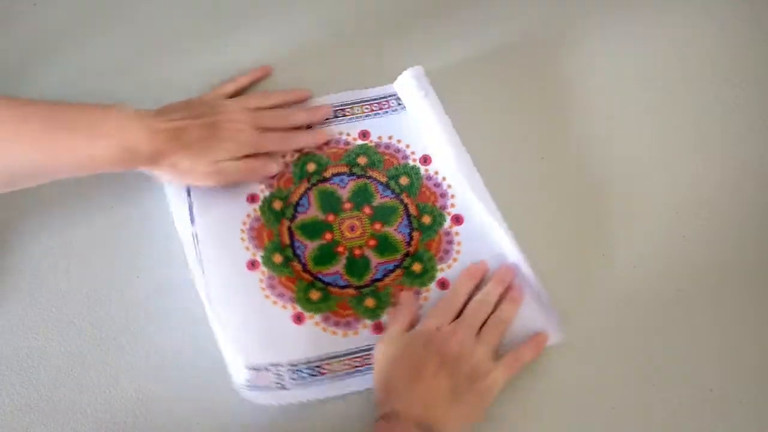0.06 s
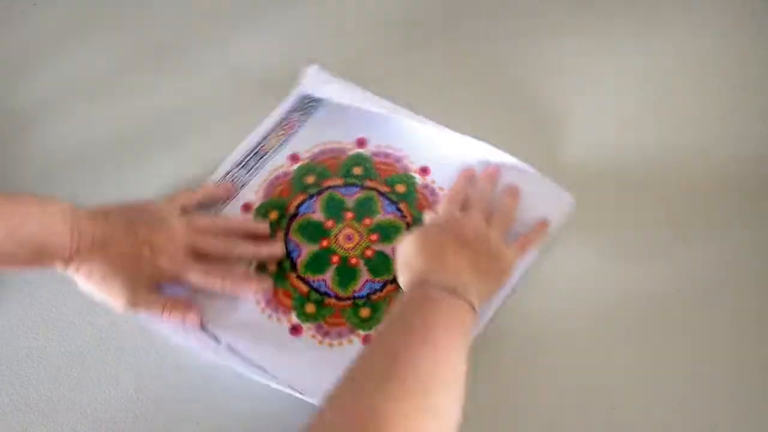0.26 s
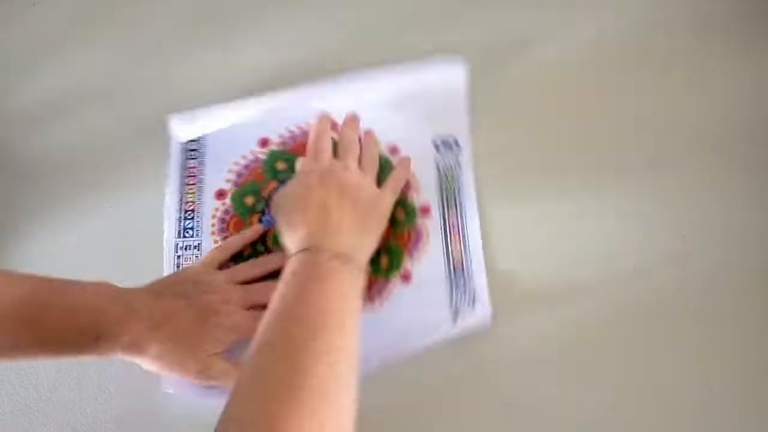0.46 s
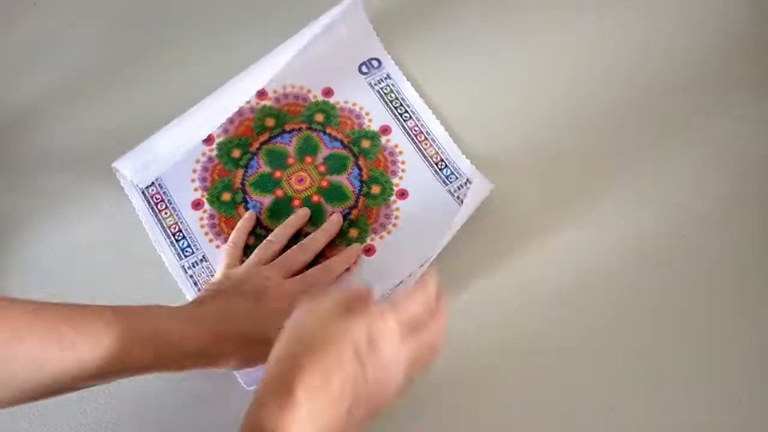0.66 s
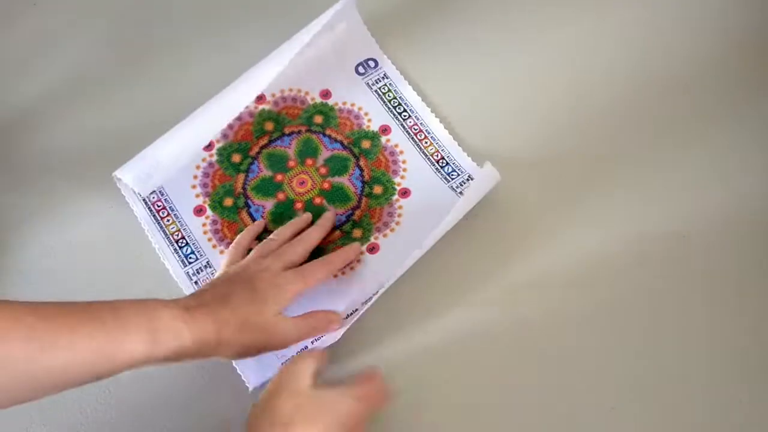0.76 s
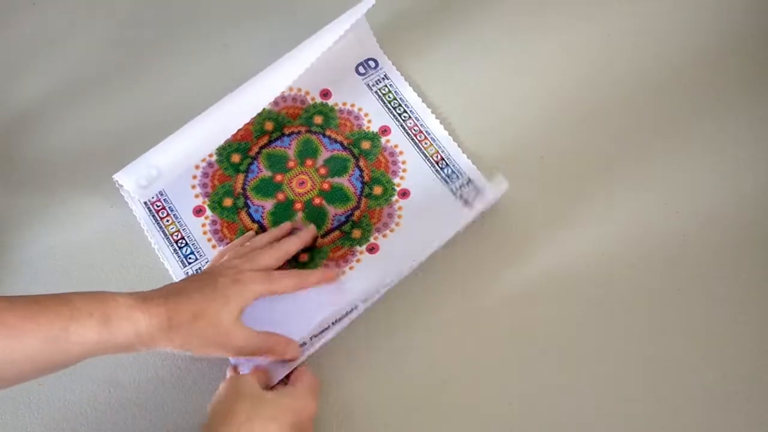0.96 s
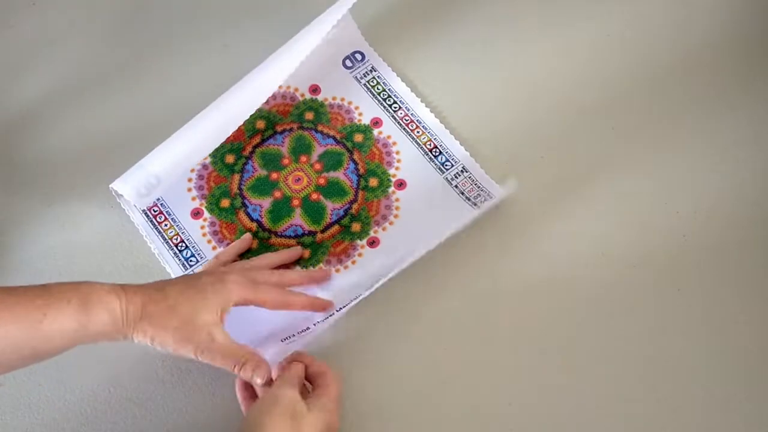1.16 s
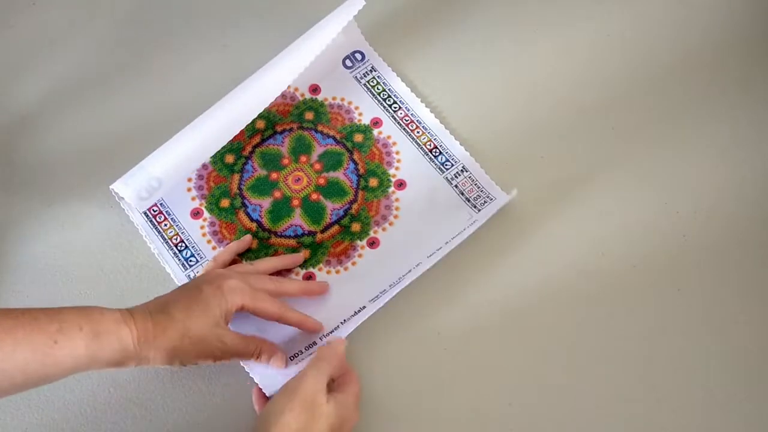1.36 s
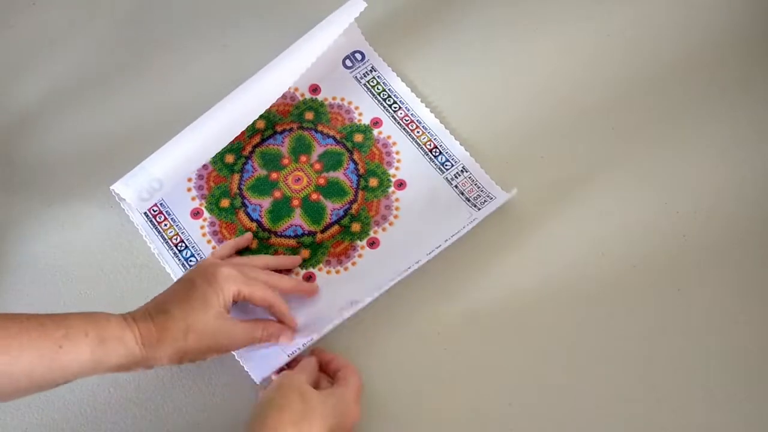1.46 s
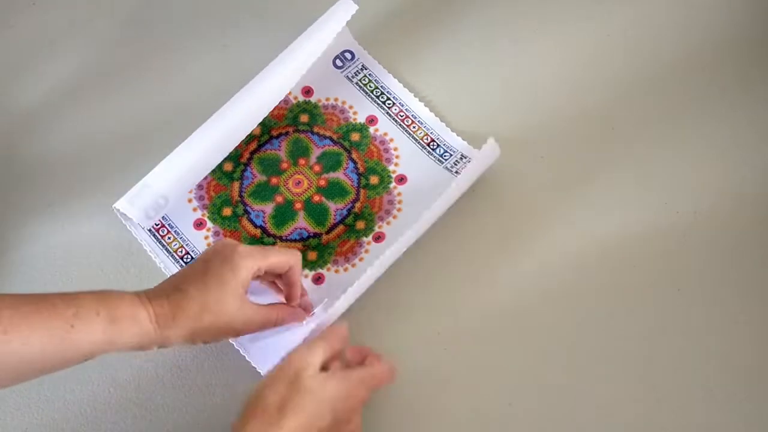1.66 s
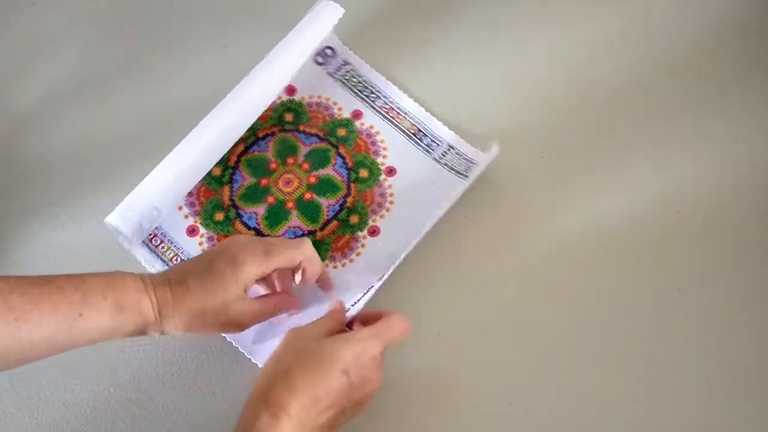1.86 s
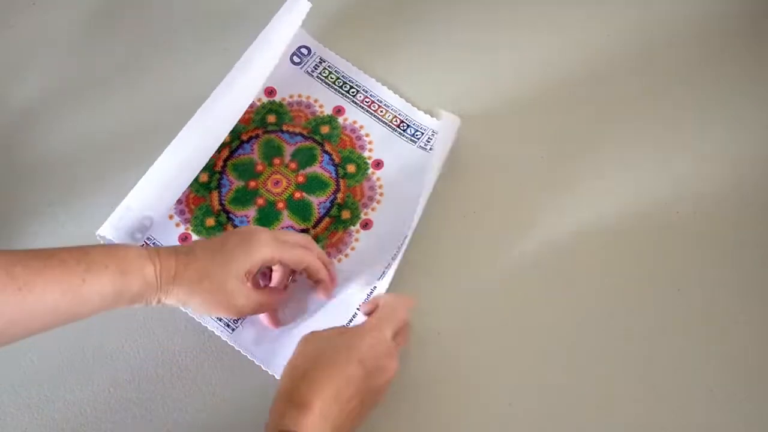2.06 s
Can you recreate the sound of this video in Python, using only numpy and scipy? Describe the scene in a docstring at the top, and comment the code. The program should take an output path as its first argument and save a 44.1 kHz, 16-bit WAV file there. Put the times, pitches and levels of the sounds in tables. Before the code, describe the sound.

Plastic film on a canvas slides and crackles sharply on a wooden table, then crinkles lightly under fingers

```python
"""A film-covered canvas is slid round on a wooden table, then fingers pick at its curled edge, close under a mono phone.
The slide is dense tiny slips and hiss of the film over a duller canvas drag with a resonant note.
Creases snap as clusters of clicks that also thump the sheet; finger taps ring the modes of the table top.
Palm presses push air at the phone; handling rumble, murmur of the house and hiss lie beneath, in a quiet small room."""
import sys
import numpy as np
from scipy import signal
from scipy.fft import rfft, irfft
from scipy.io import wavfile
from scipy.ndimage import uniform_filter1d

SR = 44100
rng = np.random.default_rng(int(sys.argv[2]) if len(sys.argv) > 2 else 0)


def transcribe(signal):
    """Save signal, clipped to [-1, 1], as a 16-bit WAV file at the path in sys.argv[1]."""
    frames = np.atleast_2d(signal).T
    limited = np.clip(frames, -1, 1)
    pcm = np.round(limited * 32767).astype(np.int16)
    wavfile.write(sys.argv[1], SR, pcm)


def gain_from_db(level_db):
    """Turn a decibel level (scalar or array-like) into a linear amplitude factor."""
    decades = np.asarray(level_db, float) / 20
    return 10 ** decades


N = 94815
T = np.arange(N) / SR

# canvas slid round: start_s, film_gain_db, drag_gain_db
SLIDE = [(0, -54, -63), (0.079, -46, -52.5), (.15, -42.5, -56.5), (.25, -38, -53), (.36, -37.5, -51.5),
         (.43, -35, -54.5), (.47, -36, -51), (.5, -38, -55.5), (.56, -36.5, -51.5), (.63, -41.5, -57.5),
         (.675, -47.5, -58.5), (.71, -42.5, -55), (.75, -49.5, -58.5), (0.801, -55, -73)]
# sheet rustling under the fingers: start_s, film_gain_db, drag_gain_db
RUSTLE = [(.82, -55, -63), (.88, -62, -86), (.96, -58.5, -69), (1.05, -59.5, -67.5), (1.13, -51, -60.5),
          (1.2, -53, -62.5), (1.27, -50, -61), (1.34, -49, -58.5), (1.4, -57.5, -69), (1.45, -64.5, -89),
          (1.53, -67, -99), (1.57, -58.5, -76), (1.65, -54, -69), (1.72, -57, -69), (1.8, -61.5, -69.5),
          (1.87, -52.5, -66), (1.91, -61, -65), (1.97, -51.5, -61), (2.04, -57.5, -59.5), (2.101, -46, -61),
          (2.15, -56, -56)]


def unit(x):
    """Scale to rms 1."""
    return x / np.sqrt(np.mean(x ** 2) + 1e-30)


def colour(x, curve):
    """Causal minimum-phase filter of unit energy whose gain follows (Hz, dB) points."""
    hz, db = np.array(curve, float).T
    size = 8192
    grid_hz = np.maximum(np.arange(size // 2 + 1) * SR / size, 1)
    log_gain = np.interp(np.log(grid_hz), np.log(hz), db) * np.log(10) / 20
    cepstrum = irfft(log_gain)
    cepstrum[1:size // 2] *= 2  # fold to minimum phase
    cepstrum[size // 2 + 1:] = 0
    h = irfft(np.exp(rfft(cepstrum)))
    return signal.fftconvolve(x, h / np.sqrt(np.sum(h ** 2)))[:len(x)]


def ring(x, hz, t60_s):
    """One decaying mode, envelope near 1 for a unit blow."""
    r = 1000 ** (-1 / (t60_s * SR))
    w = 2 * np.pi * hz / SR
    return signal.lfilter([0, np.sin(w)], [1, -2 * r * np.cos(w), r * r], x)


def clicks(rate_per_s, spread_db):
    """Random clicks of either sign, a few much stronger than the rest."""
    u = rng.random((3, N))
    strength = gain_from_db(-spread_db * np.log(u[2] + 1e-4))
    return (u[0] < rate_per_s / SR) * np.sign(u[1] - .5) * strength


def walk(rate_hz):
    """Slow random wander, rms 1."""
    k = int(SR / rate_hz)
    return unit(uniform_filter1d(uniform_filter1d(rng.standard_normal(N), k), k))


def butter(x, order, hz, kind):
    """Butterworth filter."""
    return signal.sosfilt(signal.butter(order, hz, kind, fs=SR, output="sos"), x)


def table_top(force, deep_db=0.):
    """The wooden top rings in its modes; the spot that is hit sets how much the deep one speaks."""
    # hz, gain_db, t60_s
    modes = [(203, -8, .2), (339, 0, .42), (385, -9, .12), (435, -7, .08), (540, -5, .07), (680, -5, .06),
             (905, -9, .05), (1180, 2, .1)]
    deep_mode = 1  # row number
    out = np.zeros(len(force))
    for k, (hz, db, t60_s) in enumerate(modes):
        out += gain_from_db(db + deep_db * (k == deep_mode)) * ring(force, hz, t60_s)
    return out


def film_rub():
    """Film sliding: dense tiny slips, steady hiss and stray stronger ticks, slightly patchy in level."""
    # film as the phone hears it: hz, density_db
    film_colour = [(760, -42.5), (1300, -41), (2100, -9), (2280, -3), (2900, 1), (3460, -4), (5070, -9.5),
                   (7670, 0.5), (9100, -9), (11500, -9), (14400, 1), (16000, -6.5), (16500, -44)]
    slips_per_s, slip_spread_db, hiss_share = 8000, 2, 0.75  # share of power
    ticks_per_s, tick_gain_db, tick_spread_db = 250, 8., 3.
    slips = np.sqrt(1 - hiss_share) * unit(clicks(slips_per_s, slip_spread_db))
    hiss = np.sqrt(hiss_share) * rng.standard_normal(N)
    ticks = gain_from_db(tick_gain_db) * clicks(ticks_per_s, tick_spread_db)
    t, film_db, _ = np.vstack([SLIDE, RUSTLE]).T
    patchy_db = 1.2 * walk(56)
    return colour(slips + hiss + ticks, film_colour) * gain_from_db(np.interp(T, t, film_db) + patchy_db)


def drag_note():
    """Noise through a resonator of moving pitch, which rises and then falls during the slide."""
    # resonance of the drag: start_s, pitch_hz
    pitch = [(0, 694), (.2, 700), (.28, 940), (.46, 1090), (.58, 1090), (.68, 670)]
    t60_s, start_s, end_s, fade_s = 0.0098, .1, 0.757, 0.087  # dies as the slide stops
    turn = np.exp(2j * np.pi * np.cumsum(np.interp(T, *np.array(pitch).T)) / SR)
    r = 1000 ** (-1 / (t60_s * SR))
    # decay computed in a frame that turns with the pitch
    note = (signal.lfilter([1], [1, -r], rng.standard_normal(N) / turn) * turn).real
    fade = np.clip(np.minimum(end_s - T, T - start_s) / fade_s, 0, 1)
    return unit(note) * fade


def canvas_drag():
    """Canvas on wood: dull friction noise that also drives the table top, plus the resonant note."""
    # canvas on wood: hz, density_db
    canvas_colour = [(120, -21.5), (200, 4), (286, -3.5), (333, 3), (472, 0.5), (658, 3.5), (1060, 4),
                     (1270, 5.5), (1700, 7.5), (2210, 8), (3740, -120)]
    table_db, note_db = -18., 0.5
    push = rng.standard_normal(N) * gain_from_db(1.5 * walk(90))
    drag = colour(push, canvas_colour)
    drag += gain_from_db(table_db) * unit(table_top(push))
    drag += gain_from_db(note_db) * drag_note()
    t, _, drag_db = np.vstack([SLIDE, RUSTLE]).T
    return drag * gain_from_db(np.interp(T, t, drag_db))


def snap_burst(scale_s):
    """One crease letting go: a cluster of clicks over 3 scale times, swelling then fading; energy 1."""
    u, v, w = rng.random((3, 300))  # 300 clicks
    rise, hold, click_spread_db = 0.12, .7, 2.5  # rise and hold in scale times
    late = 3 * u
    swell = np.minimum(late / rise, 1)
    fade = np.exp(-1.5 * np.maximum(late - hold, 0))
    strength = gain_from_db(-click_spread_db * np.log(v + 0.18))
    burst = np.zeros(SR // 8)
    np.add.at(burst, (late * scale_s * SR).astype(int), np.sign(w - .5) * fade * swell * strength)
    return burst / np.sqrt(np.sum(burst ** 2))


def snaps():
    """Each crease snaps as a click burst that also thumps the sheet in a broad resonance."""
    # creases: start_s, burst_gain_db, time_scale_ms, sheet_body_db (energy re burst), sheet_body_hz,
    # below_split_db (re the part above the split)
    creases = [(0.4545, -13.5, 2.7, -16, 2790, -9), (.508, -13, 4.7, -32, 3130, -11.5),
               (0.5273, -6.5, 0.32, -30, 3300, -3), (0.5493, -13, 0.66, -28, 2570, 0),
               (0.5534, -14, 2.4, -32, 3020, -0.5), (0.5756, -8.5, 2.53, -15.5, 1330, -7),
               (0.5814, -4, 2.07, -19, 3330, -5), (0.5845, -8.5, 2.95, -11.5, 2030, 0),
               (0.5888, -7, 5.5, -34, 3200, -8.5), (0.5938, -7.5, 1.2, -23, 2820, -2.5),
               (0.598, -11.5, 6.4, -35, 2500, -13), (0.6886, -36, 8.2, 1.5, 2770, -5),
               (0.7656, -24, 2.5, -8.5, 2140, -4), (0.8226, -38, 2.9, -18, 3000, 6.5),
               (0.848, -27, 6.2, -9, 2900, -5), (0.8538, -33, 7.6, -8, 2200, -8),
               (0.914, -46.5, 10.3, 5.5, 3050, -17), (0.9456, -39.5, 6.8, 1, 2800, -12),
               (1.0088, -37, 15, -17, 1780, -9), (1.022, -27, 11.3, -20, 2070, -13),
               (1.0841, -30.5, 6.2, -7.5, 2480, -4.5), (1.1141, -21, 2.92, -5.5, 2640, -5.5),
               (1.14, -31, 8.5, -3, 1420, 1), (1.1831, -24.5, 2.9, -18, 2060, -8.5),
               (1.2393, -22.5, 3.5, -11, 2420, -8), (1.262, -18, 2.1, -22, 2020, -16),
               (1.281, -22, 1.3, -29, 2690, -7), (1.2898, -23, 5.4, -16, 2430, -16),
               (1.2935, -20, 1.8, -34, 2570, -15), (1.2982, -15.5, 2.6, -37, 2600, -5.5),
               (1.3017, -10.5, 2.11, -13, 2730, -11), (1.306, -16, 7.6, -32, 2490, -2.5),
               (1.343, -36, 7.2, -4, 1410, 1), (1.419, -43.5, 8.1, 2.5, 3100, 1.5),
               (1.56, -39, 5.5, -10, 1420, -8), (1.5807, -28.5, 6.9, -8.5, 2650, -9.5),
               (1.6133, -15, 2.25, -9, 1760, -4), (1.634, -37, 10, 0, 2440, -12),
               (1.6601, -19, 2.9, -9, 2800, -17), (1.6653, -13, 1.04, -33, 1880, -16),
               (1.7346, -31.5, 6.4, -9.5, 2680, -3.5), (1.7726, -31, 3.86, -7.5, 1770, 2.5),
               (1.8086, -33.5, 3, -6, 2460, 3), (1.8196, -21.5, 3.8, -15.5, 2590, -6.5),
               (1.8502, -23.5, 4.75, -8, 2560, -5.5), (1.94, -40, 5, -4.5, 3420, 2),
               (1.953, -27.5, 5.8, -5, 2620, -7), (2.0024, -31.5, 7.7, -4.5, 2660, -7),
               (2.009, -26, 2.54, -12, 2070, 1.5), (2.064, -44, 7.7, 3, 2100, -0.5),
               (2.0764, -21, 5.8, -12, 2260, -4.5), (2.086, -20.5, 6, -12, 1790, -5),
               (2.114, -34.5, 6.8, -2, 2270, -15), (2.1296, -23.5, 4, -18, 3060, -4.5)]
    # hz, density_db
    snap_colour = [(1470, -21.5), (2500, -6), (3240, -1.5), (5010, -7), (7550, 3), (8770, -3.5),
                   (10300, -6.5), (11100, -8), (14400, 3), (16000, -5.5), (16500, -41)]
    split_hz, body_cut_hz, body_q = 10000, 1210, 2.4
    top, mid, body = np.zeros((3, N + SR))
    for s, db, ms, body_db, hz, mid_db in creases:
        # longer bursts carry more energy
        burst = snap_burst(ms / 1000) * gain_from_db(db) * np.sqrt(1 + ms / 1000 * SR / 20)
        thump = ring(burst, hz, body_q * np.log(1000) / (np.pi * hz))
        match = np.sqrt(np.sum(burst ** 2) / np.sum(thump ** 2))
        at = slice(int(s * SR), int(s * SR) + len(burst))
        top[at] += burst
        mid[at] += burst * gain_from_db(mid_db)
        body[at] += thump * gain_from_db(body_db) * match
    crackle = butter(top[:N], 3, split_hz, "high") + butter(mid[:N], 3, split_hz, "low")
    return colour(crackle, snap_colour) + butter(body[:N], 3, body_cut_hz, "high")


def taps():
    """Soft fingertip pushes, each with a short scuff, ring the table top until the resting hand mutes it."""
    # start_s, push_gain_db, contact_ms, deep_mode_db, scuff_db (re push gain), free_ring_s
    touches = [(.9115, -43, 0.65, -12, -12, 0.018), (.919, -54, 2.3, -7, -16, 0.13),
               (.937, -50, 0.67, -7, -7, .1), (.946, -53, 0.39, -15, -4, 0.13),
               (.963, -45, 1.9, -0.5, -12, 0.062), (1.4176, -45.5, 0.9, -14, -12, .006),
               (1.423, -45.5, 2.05, 4.5, -26, 0.027), (1.945, -57, 0.58, -5, -2.5, .1),
               (2.08, -50, 1.1, -0.5, -8.5, .05), (2.105, -55, 2.1, -11, -10, 0.044),
               (2.118, -45.5, 2.6, -4, -12.5, .04)]
    mute_db, mute_s = -13.5, 0.0087
    scuff_decay_s, scuff_top_hz = 0.022, 1110  # the hand settles noisily
    wood, scuff = np.zeros((2, N))
    for s, db, ms, deep_db, scuff_db, free_s in touches:
        contact_s = ms / 1000
        x = (T - s) / contact_s
        force = gain_from_db(db) * (abs(x - .5) < .5) * np.sin(np.pi * x) / (contact_s * SR)  # half sine
        mute = gain_from_db(mute_db * np.clip((T - s - free_s) / mute_s, 0, 1))
        wood += table_top(force, deep_db) * mute
        scuff += gain_from_db(db + scuff_db) * (T > s) * np.exp(-abs(T - s) / scuff_decay_s)
    noise = unit(butter(rng.standard_normal(N), 2, [150, scuff_top_hz], "band"))
    return butter(wood, 2, 150, "high") + scuff * noise


def presses():
    """The palm presses the sheet flat, pushing air at the phone: one slow pressure swing each."""
    # centre_s, peak_db, length_ms
    pushes = [(.592, -53, 55), (.74, -55, 130)]
    out = np.zeros(N)
    for s, db, ms in pushes:
        x = (T - s) * 2000 * np.pi / ms
        out -= gain_from_db(db) * 1.65 * x * np.exp(-x ** 2 / 2)  # 1.65 brings the peak to 1
    return out


def rumble():
    """Handling rumble: two bands of bass noise with separately moving levels."""
    # start_s, level_below_50_hz_db, level_60_to_160_hz_db
    surge = [(0.0, -70, -81), (0.04, -65.5, -67.5), (0.53, -61.5, -65), (0.56, -74, -67), (0.59, -60, -70),
             (0.67, -50, -72), (0.77, -67, -76), (0.84, -57, -63), (0.89, -61, -79), (0.94, -57.5, -64),
             (1.13, -61.5, -68), (1.25, -66, -62.5), (1.31, -56, -64.5), (1.6, -61.5, -70),
             (1.89, -58, -72.5), (1.9, -72, -72), (2.15, -53, -63.5)]
    # hz, density_db
    deep_colour = [(4, -2.5), (10, 13), (25, -2.5), (50, -7.5), (80, -32.5)]
    # hz, density_db
    low_colour = [(35, -26), (60, 0), (130, -1), (170, -14), (300, -33)]
    t, deep_db, low_db = np.array(surge).T
    out = np.zeros(N)
    for shape, db in ((deep_colour, deep_db), (low_colour, low_db)):
        noise = colour(rng.standard_normal(N + SR), shape)[SR:]  # skip the filter's start
        out += unit(noise) * gain_from_db(np.interp(T, t, db))
    return out


def house_murmur():
    """Murmur of the house: coloured noise, slowly wandering in level."""
    # hz, density_db
    air_colour = [(88, -46.5), (150, -1), (275, -7.5), (350, -2.5), (595, -8.5), (728, -6), (982, -7.5),
                  (1500, -14), (1950, -52), (3300, -120)]
    return colour(rng.standard_normal(N), air_colour) * gain_from_db(-67.5 + 2.35 * walk(7.8))


def microphone_hiss():
    """Steady coloured noise of the microphone."""
    # hz, density_db
    hiss_colour = [(590, -66), (1000, -50), (1660, 2.5), (5110, -7.5), (10900, -63), (13800, -4),
                   (15900, -31), (16500, -71)]
    return gain_from_db(-68.5) * colour(rng.standard_normal(N), hiss_colour)


def room(x):
    """Direct sound, one near reflection and a short diffuse tail."""
    echo_s, echo_db = .006, -13
    t60_s, tail_db, start_s = 0.28, -10, 0.0034
    t = T[:SR // 2]
    tail = rng.standard_normal(len(t)) * 1000 ** (-t / t60_s) * np.clip(t / start_s - 1, 0, 1)
    h = gain_from_db(tail_db) * tail / np.sqrt(np.sum(tail ** 2))
    h[0] += 1
    h[int(echo_s * SR)] += gain_from_db(echo_db)
    return signal.fftconvolve(x, h)[:N]


def scene():
    """All sources at one microphone, the same in both channels."""
    close = film_rub() + canvas_drag() + snaps() + taps()
    mono = room(close) + presses() + rumble() + house_murmur() + microphone_hiss()
    return np.array([mono, mono])


def top_cut(x):
    """Nothing passes above the cut-off."""
    return signal.sosfilt(signal.butter(12, 16970, fs=SR, output="sos"), x)


def record(dry):
    """The phone cuts the top steeply."""
    top_hz, ripple_db, stop_db = 15900, .3, 30
    low_pass = signal.ellip(8, ripple_db, stop_db, top_hz, fs=SR, output="sos")
    mix = signal.sosfilt(low_pass, dry)
    return top_cut(mix)


dry = scene()
out = record(dry)
transcribe(out)
```